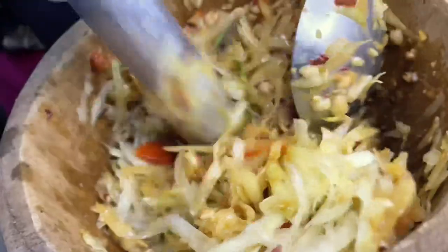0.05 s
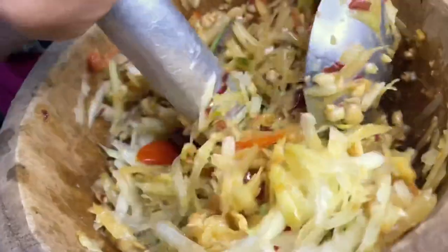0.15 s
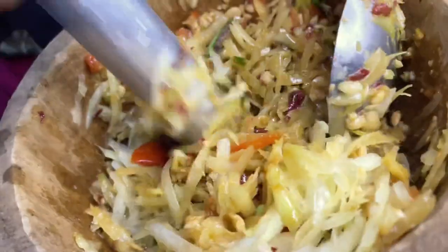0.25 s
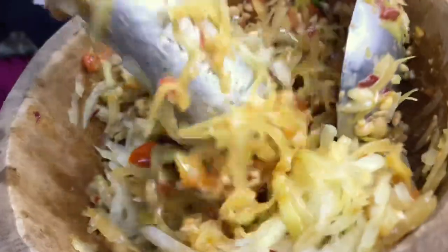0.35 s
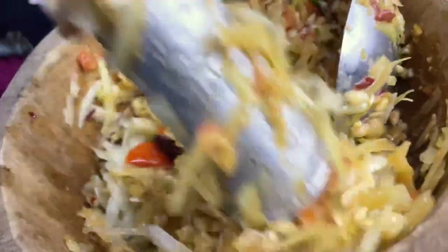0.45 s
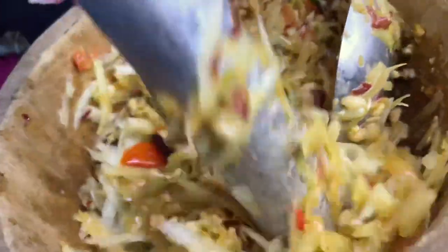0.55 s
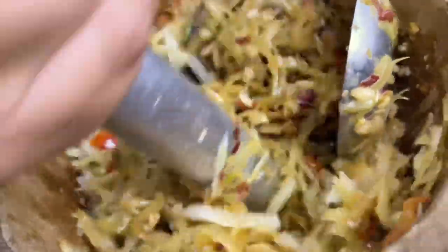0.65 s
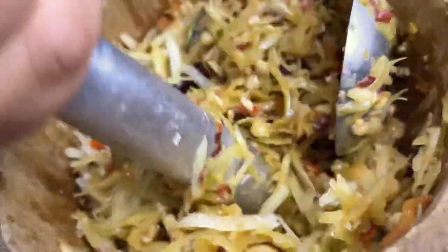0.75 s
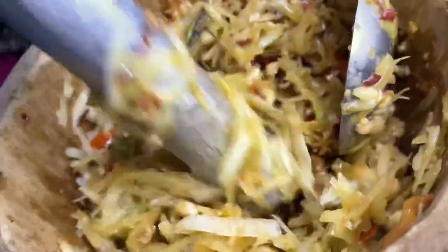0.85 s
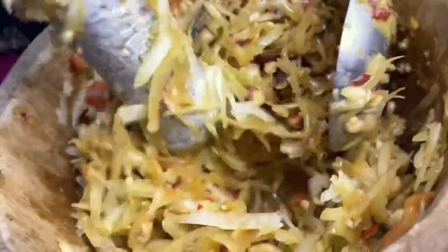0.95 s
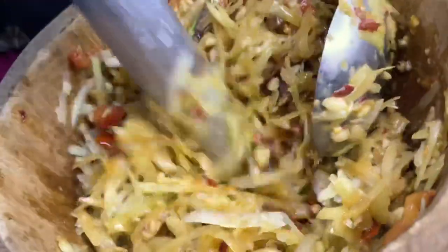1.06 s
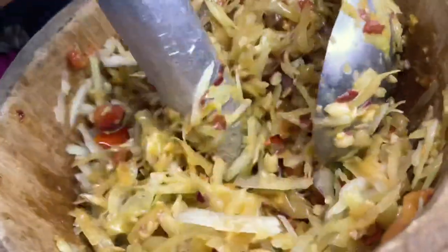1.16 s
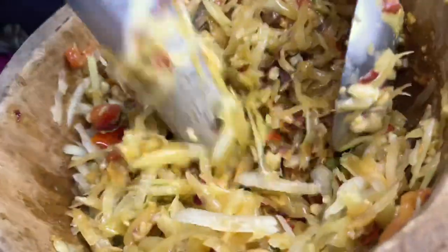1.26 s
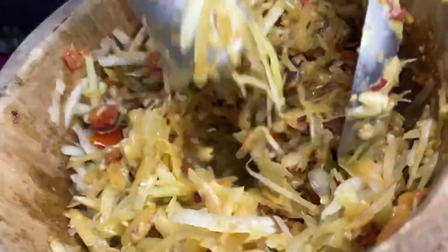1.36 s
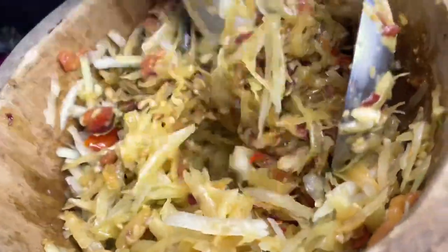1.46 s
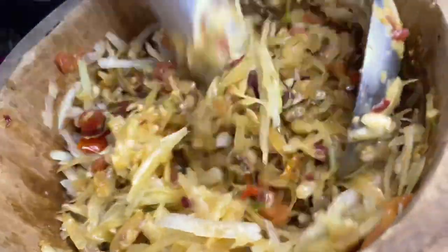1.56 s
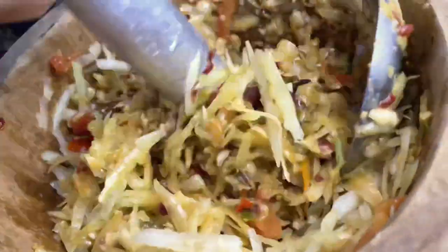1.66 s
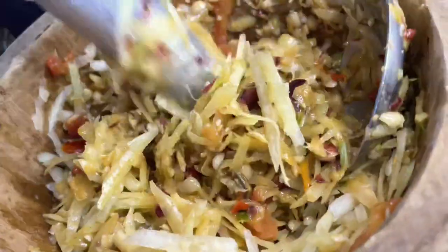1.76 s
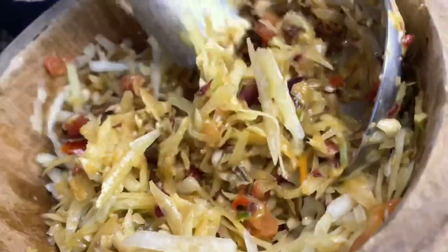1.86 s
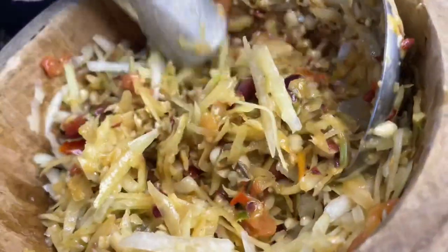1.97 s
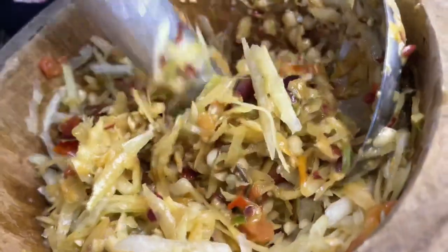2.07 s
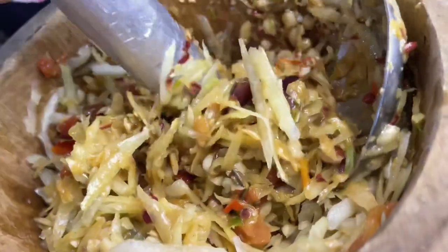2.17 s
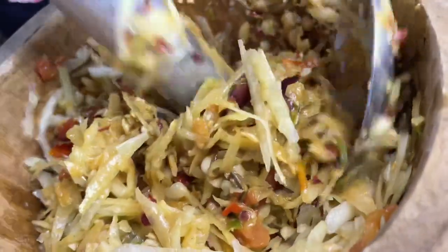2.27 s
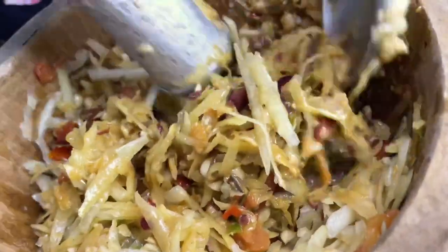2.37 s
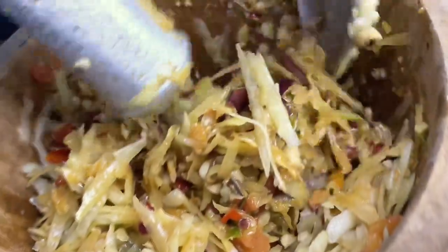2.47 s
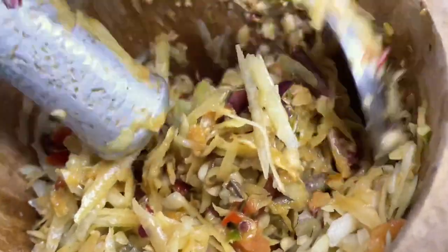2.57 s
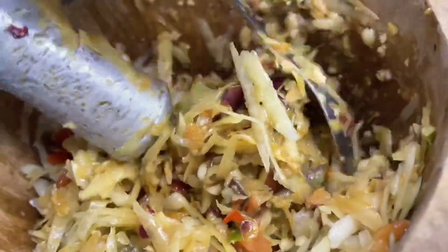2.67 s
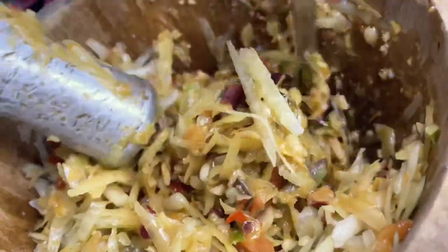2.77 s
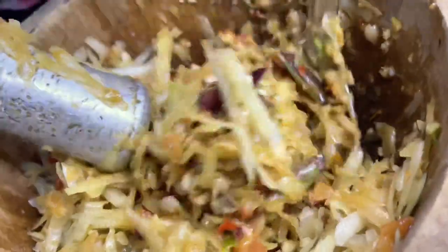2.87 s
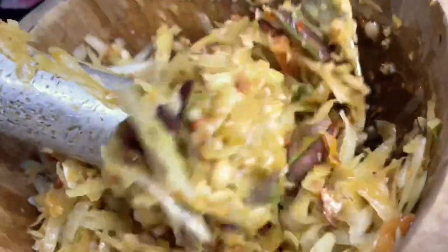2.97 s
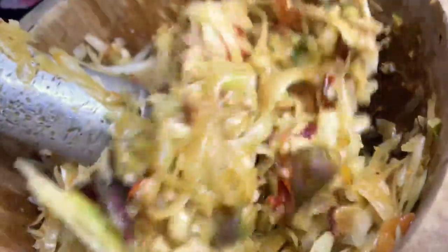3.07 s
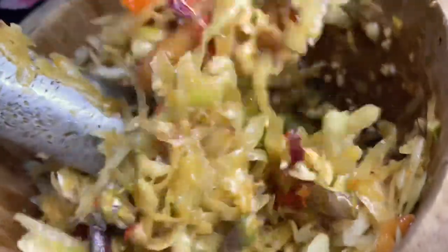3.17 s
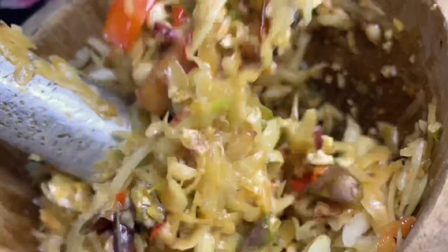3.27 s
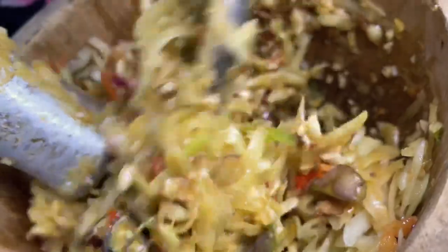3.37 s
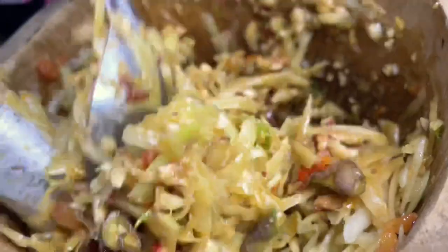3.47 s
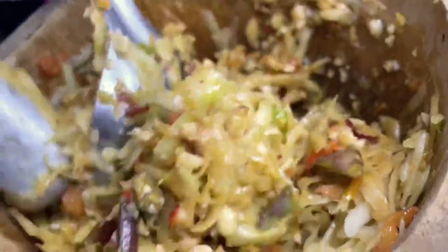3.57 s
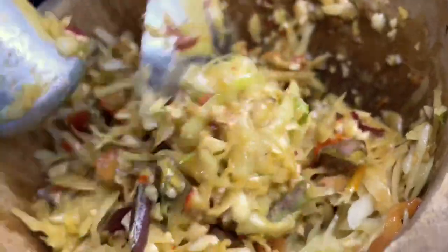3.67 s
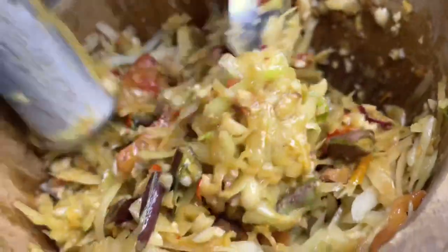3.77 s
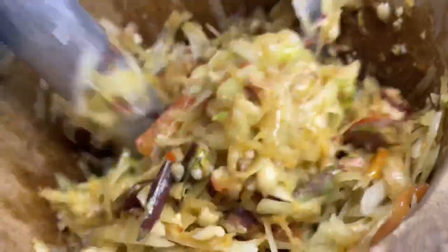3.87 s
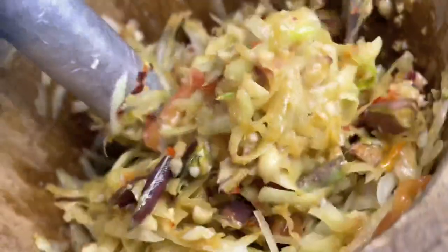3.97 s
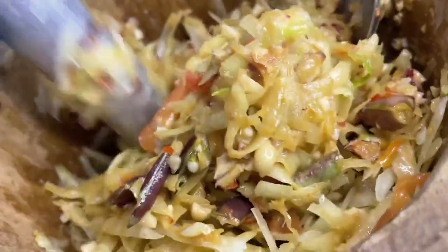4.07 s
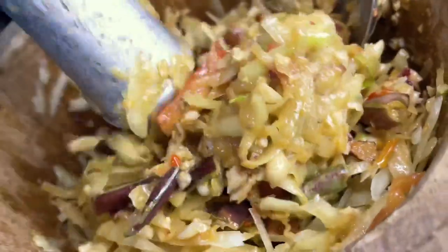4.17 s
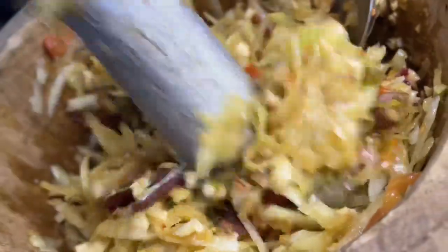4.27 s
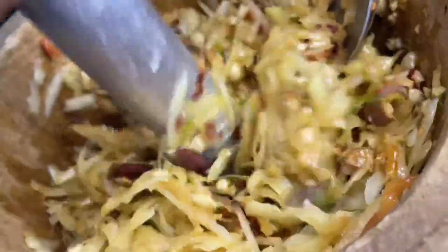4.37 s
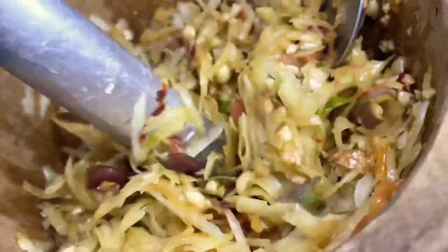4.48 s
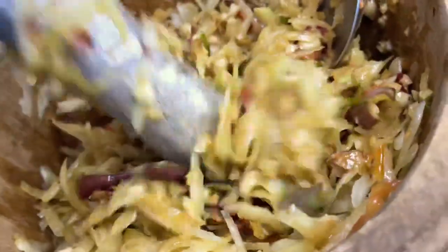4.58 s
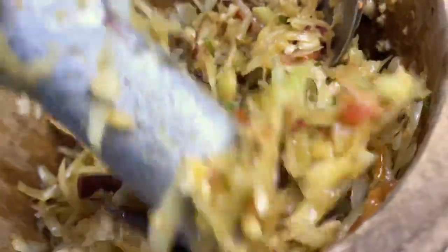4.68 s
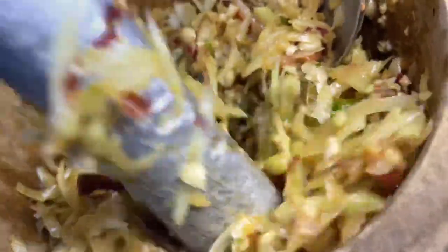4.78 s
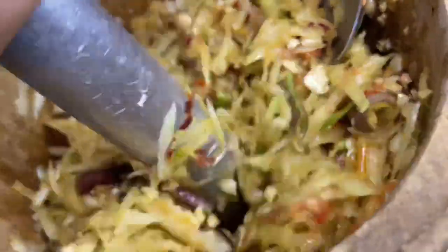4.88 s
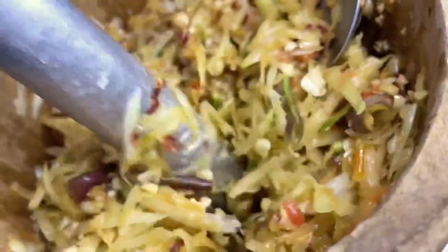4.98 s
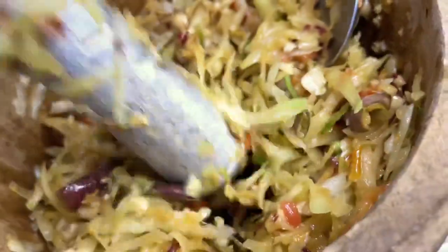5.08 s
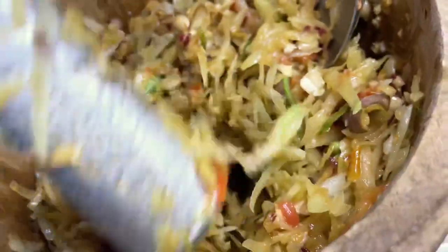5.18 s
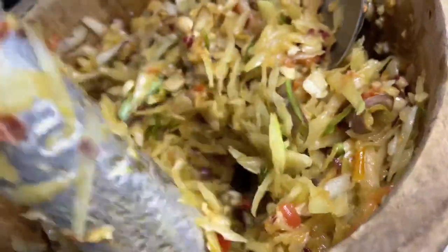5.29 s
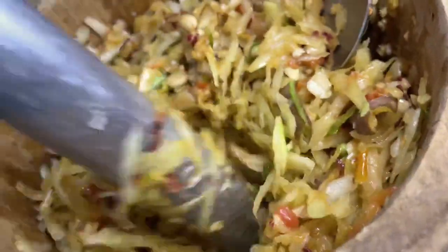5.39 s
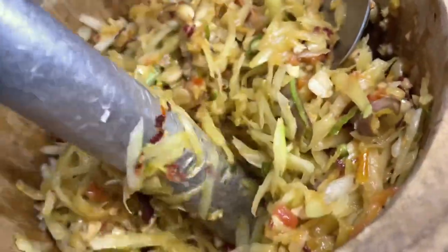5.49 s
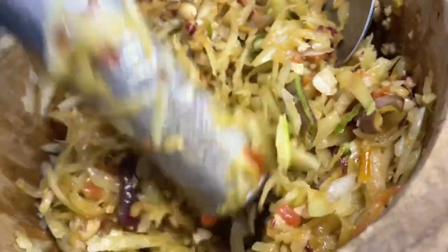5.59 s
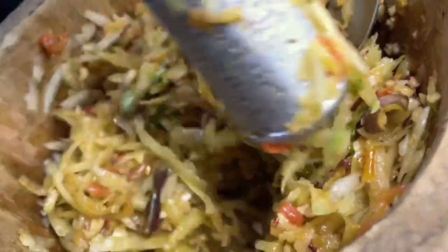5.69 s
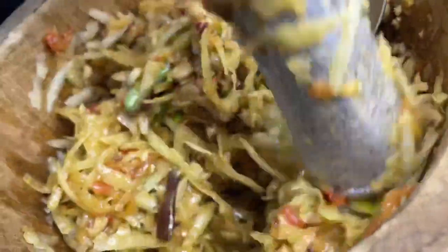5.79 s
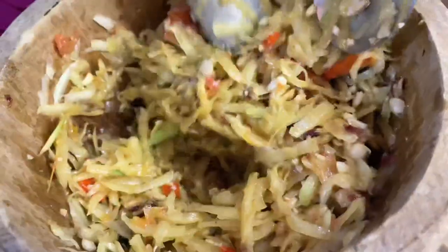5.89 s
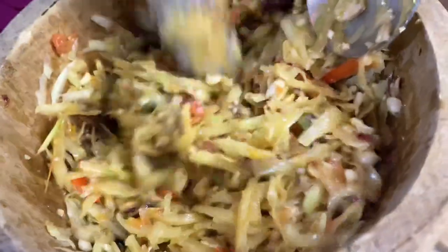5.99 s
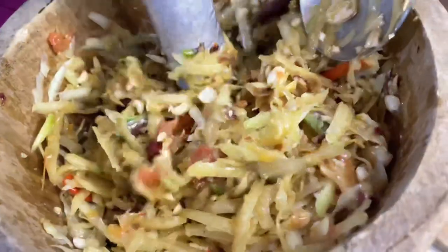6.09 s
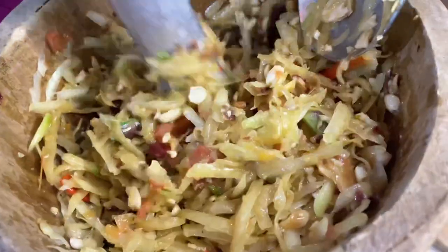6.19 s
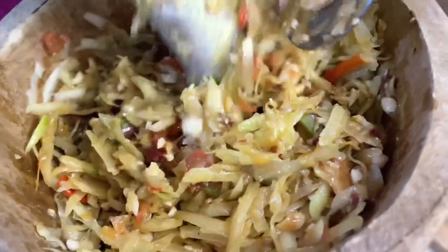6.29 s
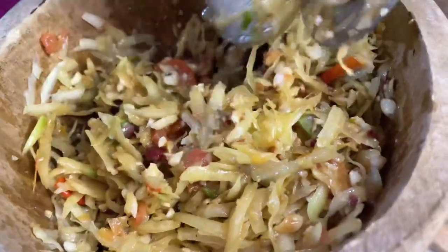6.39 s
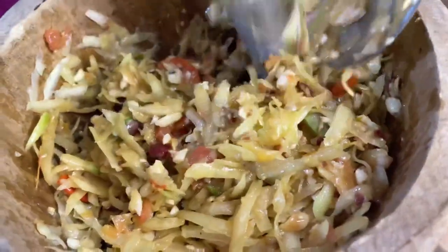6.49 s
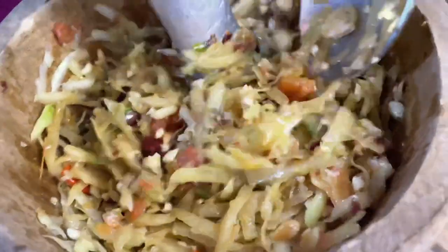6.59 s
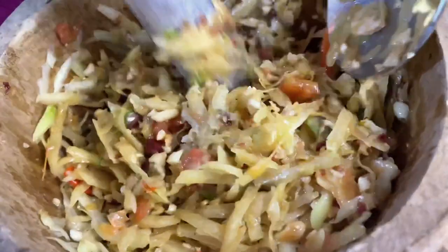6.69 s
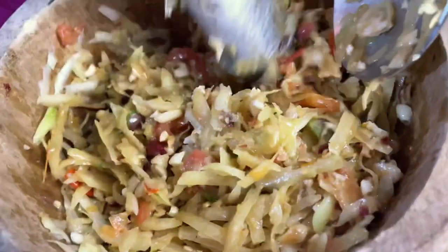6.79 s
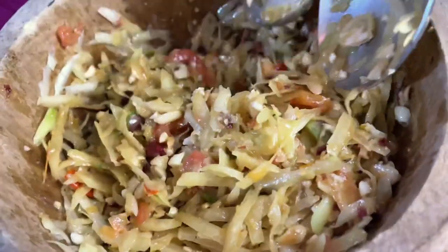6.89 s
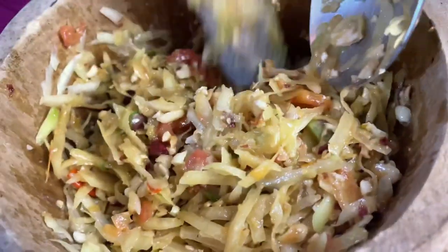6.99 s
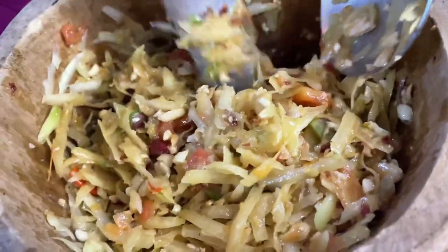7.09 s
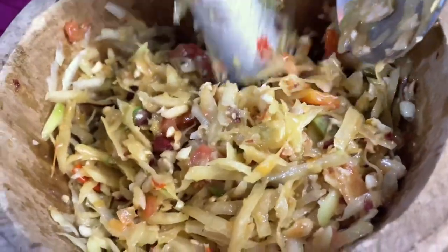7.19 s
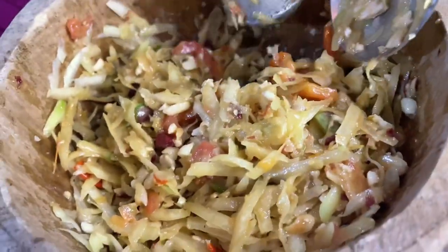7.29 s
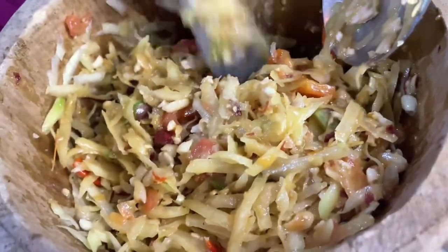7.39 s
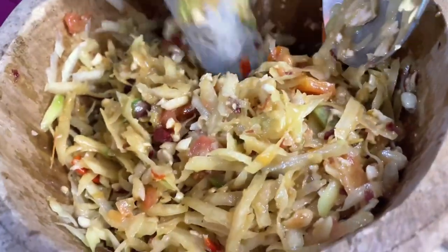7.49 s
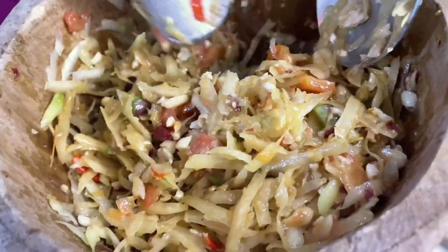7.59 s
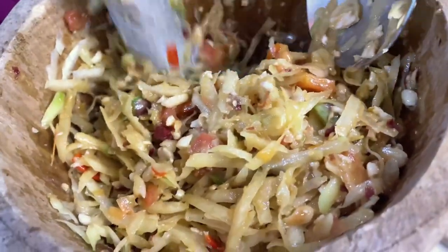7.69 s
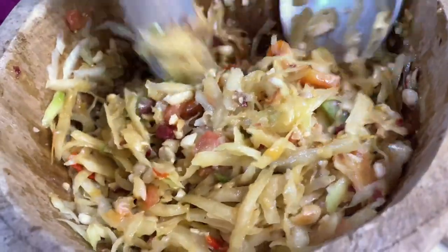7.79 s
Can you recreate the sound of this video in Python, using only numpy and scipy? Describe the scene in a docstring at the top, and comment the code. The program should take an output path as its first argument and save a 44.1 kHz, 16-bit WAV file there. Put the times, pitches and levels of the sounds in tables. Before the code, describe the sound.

A pestle pounds wet shredded salad in a wooden mortar, irregular dull knocks mixed with squelches and fizzing crunches in a small hard-walled kitchen.

```python
"""A pestle pounds shredded salad in a wooden mortar while a spoon turns it, close up in a kitchen.
Most strokes end in a dull knock: damped modes of the wood, with a blur of noise around them.
Each stroke squelches and fizzes through the wet shreds, as dense grains of tiny dying rings.
Short pops, snaps and faint ticks are added, and after every blow the hard-walled room rings,
as decaying noise convolved with the sound; a quiet rumble and hiss of shaped noise lies beneath."""
import sys
import numpy as np
from scipy import signal
from scipy.io import wavfile

SR = 44100
rng = np.random.default_rng(int(sys.argv[2]) if len(sys.argv) > 2 else 0)


def write(x):
    x = np.atleast_2d(x).T
    wavfile.write(sys.argv[1], SR, np.round(np.clip(x, -1, 1) * 32767).astype(np.int16))


N = 346008

# blows of the pestle: (time [s], pitch of the bowl's main ring [Hz], force [dB],
# cushion of shreds [0-1], place from the bowl's floor to its wall [0-1])
BLOWS = [(.715, 805, -21.5, 0.01, .12), (1.682, 685, -30, 0.63, 0.36), (2.035, 873, -27.5, .02, 0.44),
         (2.0416, 674, -23, .8, 0.62), (2.4308, 850, -41, 1.0, 0.51), (2.732, 692, -30, 0.6, 0.069),
         (3.594, 720, -46.5, 1, 0.23), (3.9361, 682, -32.5, .9, 0.43), (4.4689, 725, -29.5, 0.64, 0.19),
         (4.974, 752, -22, 0.18, 0.16), (5.3271, 722, -17, 0.18, 1), (5.361, 733, -28, .3, .3),
         (5.49, 706, -39, 0.2, .05), (6.102, 713, -27.5, 0.41, 0.058), (6.546, 643, -48, 0.5, 0.42),
         (6.678, 730, -22, 0, 0.24), (6.9872, 630, -43, 0.14, 0.46), (7.0194, 780, -42.5, 0.5, .05),
         (7.078, 564, -45, 0.6, .02), (7.093, 573, -45, .6, 0.018), (7.3797, 840, -33.5, 0.07, 0.42),
         (7.417, 627, -34, 0.38, 0.062), (7.76, 680, -41.5, .7, 0.61), (7.788, 720, -36, .6, 0.28)]
# edges of the six frequency parts of a knock: (frequency [Hz])
PART_EDGES_HZ = [90, 300, 560, 1100, 1750, 3100, 15500]
# spectral density of the fizz of the top shreds: (frequency [Hz], level per Hz [dB])
FIZZ_SPECTRUM = [(2000, -2), (3000, -4.5), (4400, 0), (6000, -1.5), (8200, -2.5), (11000, -9),
                 (16000, -11.5)]

MAIN_RING_HZ = 730
PART_BANDS = [signal.butter(2, PART_EDGES_HZ[k:k + 2], "band", fs=SR, output="sos") for k in range(6)]
PART_FLOORS = [signal.butter(3, .85 * hz, "high", fs=SR, output="sos") for hz in PART_EDGES_HZ[:-1]]


def amp(db):
    """Amplitude ratio of a level in decibels."""
    return 10 ** (np.asarray(db) / 20)


def evened(x):
    """Normalization to unit root-mean-square amplitude."""
    return x / np.sqrt(np.mean(x ** 2) + 1e-20)


def read(points, hz, axis=1):
    """Interpolation of a table's column at any frequency, along straight lines in log frequency."""
    table = np.array(points, float)
    return np.interp(np.log(hz + 1), np.log(table[:, 0]), table[:, axis])


def over_time(points):
    """Linear interpolation of a (time, value) table at every sample."""
    return np.interp(np.arange(N) / SR, *np.transpose(points))


def add(mix, s, sound):
    """Linear superposition of a sound that starts at s seconds."""
    part = mix[max(round(s * SR), 0):][:len(sound)]
    part += sound[:len(part)]


def decay(t, t60):
    """Exponential damping: the amplitude falls by 60 dB in t60 seconds."""
    return np.exp(-np.log(1000) * t / t60)


def knock(ring_hz, clack_shift, levels_db, blur_t60=0.04, contact_s=0.0012, detune=0.013):
    """Modal synthesis: a blow rings the wood's modes, plus a short blur of dense ones damped by salad."""
    # modes of mortar and pestle: (frequency [Hz], level [dB], 60 dB decay time [s])
    wood_modes = [(156, 0, .06), (363, 1, 0.059), (426.3, -3.5, 0.058), (535, 1.5, 0.047),
                  (599.5, -9, 0.05), (737.5, 1.5, 0.027), (855, -2, .02), (1345, 0, .06), (1550, -9, .015),
                  (1840, -16.5, 0.033), (2023, 6, 0.018), (2280, 3, .018), (2810, -9.5, 0.014),
                  (3460, 8.5, 0.0031), (4524, 1.5, 0.014), (6470, 0, .007)]
    # strength of each part's blur of dense modes: (factor on its clear modes)
    blur_strength = [1.3, 0.51, 0.23, 1, 0.47, 0.69]
    t = np.arange(SR // 11) / SR
    hz, db, t60 = np.transpose(wood_modes)
    part_of = np.searchsorted(PART_EDGES_HZ[1:-1], hz)

    # the strike point and the load of salad shift each mode a little
    random_shift = 1 + detune * rng.standard_normal(len(hz))
    hz = hz * np.where(part_of == 2, ring_hz / MAIN_RING_HZ, random_shift)
    hz = hz * np.where(part_of == 4, clack_shift, 1)
    size = amp(db + 2 * rng.standard_normal(len(hz))) * rng.choice([-1, 1], len(hz))
    modes = size[:, None] * np.sin(2 * np.pi * hz[:, None] * t) * decay(t, t60[:, None])

    contact = 1 - np.exp(-(t / contact_s) ** 2)  # the shreds cushion the first instant
    out = np.zeros(len(t))
    for k, level_db in enumerate(levels_db):
        dull_noise = signal.lfilter([1], [1, -.9], rng.standard_normal(len(t)))
        blur = signal.sosfilt(PART_BANDS[k], dull_noise) * decay(t, blur_t60)
        clear = evened(modes[part_of == k].sum(0))
        part = signal.sosfilt(PART_FLOORS[k], contact * (clear + blur_strength[k] * evened(blur)))
        out += amp(level_db) * part / np.std(part[:SR // 50])  # level set over the first 20 ms
    return out


def pestle(loud_clack_s=7.3797, loud_clack_db=-25.5, clack_part=4):
    """Position-dependent modal excitation: shreds muffle high parts, the wall trades thud for rim ring."""
    # parts of a knock, low to high: floor thump, thud of the bowl's base, main ring, rim ring,
    # pestle clack, contact tick: (level at 0 dB force [dB], slope with force [dB per dB],
    # change from a full cushion [dB], change from striking the wall [dB])
    part_response = [(-25.5, 0.61, -0.5, 1), (2.5, 1, 0, -17), (0, 1, 0, 0), (-10.5, 1, -13, 6.5),
                     (0, 1, -20, 0), (-17.5, 0.84, -14.5, -0.5)]
    # the clack is pitched higher in the later blows: (time [s], factor on mode frequency)
    clack_shifts = [(5.4, 1.003), (6.0, 1.132)]
    out = np.zeros(N)
    full_db, per_db, cushion_db, wall_db = np.transpose(part_response)
    shift_s, shift = np.transpose(clack_shifts)
    for s, ring_hz, force_db, cushion, place in BLOWS:
        levels_db = full_db + per_db * force_db + cushion_db * cushion + wall_db * place
        add(out, s, knock(ring_hz, np.interp(s, shift_s, shift), levels_db))

    # one blow has an extra-loud clack around 2.3 kHz
    clack_only_db = np.where(np.arange(len(part_response)) == clack_part, loud_clack_db, -np.inf)
    clack_shift = np.interp(loud_clack_s, shift_s, shift)
    add(out, loud_clack_s, knock(MAIN_RING_HZ, clack_shift, clack_only_db))
    return out


def crackle(per_s, spread_db):
    """Poisson-like impulses: random clicks of either sign, many small and a few large."""
    chance, size = rng.random((2, N), dtype=np.float32)
    at = np.flatnonzero(chance < per_s / SR)
    signed = 2 * size[at] - 1
    rarity = np.minimum(-np.log(abs(signed) + 1e-12), 3.5)
    out = np.zeros(N)
    out[at] = np.sign(signed) * amp(spread_db * rarity)
    return out


def grains(points, per_s, spread_db, cycles, drift_db, count=36):
    """Granular resonance: tiny dying rings of many pitches, whose balance drifts as the shreds shift."""
    t, out = np.arange(SR // 40) / SR, np.zeros(N)
    edges = np.geomspace(points[0][0], points[-1][0], count + 1)
    knots = np.arange(0, N + SR // 12, SR // 12)
    for hz in np.sqrt(edges[:-1] * edges[1:]):
        turns = hz * t
        ring = np.sin(2 * np.pi * turns) * np.exp(-turns / cycles) * (1 - np.exp(-2 * turns))
        drift = np.interp(np.arange(N), knots, rng.standard_normal(len(knots)))
        clicks = crackle(per_s / count, spread_db) * amp(drift_db * drift)
        # higher rings are shorter, so start taller
        out += amp(read(points, hz)) * hz * signal.oaconvolve(clicks, ring)[:N]
    return evened(out)


def push(s, swell, fade, db, roundness=1.274):
    """Power envelope of one push: 20 dB down one swell before its peak and one fade after it."""
    t = np.arange(0, N, 32) / SR
    away = np.minimum(np.where(t < s, (s - t) / swell, (t - s) / fade), 10)
    # roundness 1 is a pointed peak, 2 a bell
    return amp(db) ** 2 * np.exp(-np.log(100) * np.minimum(away, away ** roundness))


def loudness(pushes):
    """Incoherent addition: the powers of many pushes sum, and the root is their joint amplitude."""
    power = sum(push(*row) for row in pushes)
    return np.interp(np.arange(N), np.linspace(0, N, len(power)), np.sqrt(power))


def shreds(squelch_per_s=3000, fizz_per_s=8000, squelch_spread_db=2.4):
    """Dense impulsive fracture: deep shreds squelch in the bowl's hollow, those on top fizz."""
    # pushes through the shreds and the smack as the pestle lifts out: (peak time [s], swell [s],
    # squelch level [dB], fizz level [dB], lift delay after the peak [s], lift level [dB])
    strokes = [(.156, 0.041, -31, -40.5, 0.15, -38.5), (0.698, 0.073, -39.5, -40, 0.16, -47),
               (1.158, 0.024, -25, -35, 0.14, -36.5), (1.66, 0.071, -40, -39, 0.13, -49.5),
               (2.14, 0.098, -44.5, -44, .16, -55), (2.691, 0.065, -46.5, -46.5, 0.11, -54),
               (3.951, .075, -42, -44.5, 0.18, -40), (4.444, 0.047, -32, -37.5, .16, -49),
               (4.957, 0.054, -34, -38.5, .17, -47.5), (5.476, 0.049, -32.5, -37, .131, -40),
               (6.093, 0.068, -36, -45, 0.2, -54), (6.633, 0.049, -35, -36.5, .112, -40.5),
               (7.113, 0.028, -39, -38, 0.044, -48), (7.832, 0.059, -45.5, -50, .15, -50)]
    # the spoon brushes over the top of the heap, fizz only: (time [s], level [dB])
    spoon_brushes = [(.1, -51), (1.12, -54.5), (1.368, -54), (3.58, -55.5), (6.345, -56.5), (7.462, -44)]
    # spectral density of the deep squelch: (frequency [Hz], level per Hz [dB])
    squelch_spectrum = [(200, -25.5), (380, -19), (560, -6), (820, 3.5), (1120, -3.5), (1450, -2),
                        (1950, -2.5), (2800, -11), (4500, -14)]
    # a blow leaves the heap crunching, at a level relative to its force
    crunch_db, crunch_swell_s, crunch_fade_s = -24.5, 0.014, 0.28
    brush_s = 0.051  # swell and fade of a brush
    fade_share = 0.77  # a push dies away in this share of its swell
    fizz_longer = 1.1  # the top shreds are met first and left last
    # a smack swells and fades in lift_s at lift_ref_db; a weaker one comes from a slower lift
    # and lasts longer, twice as long for each lift_doubling_db
    lift_s, lift_ref_db, lift_doubling_db, lift_fizz_db = .019, -38, 9, -6

    deep = []
    for s, _, force_db, *_ in BLOWS:
        deep.append((s + crunch_swell_s, crunch_swell_s, crunch_fade_s, force_db + crunch_db))
    top = [(s, brush_s, brush_s, db) for s, db in spoon_brushes]
    for s, swell, squelch_db, fizz_db, lift_after, lift_db in strokes:
        fade = fade_share * swell
        lift = lift_s * 2 ** ((lift_ref_db - lift_db) / lift_doubling_db)
        deep.append((s, swell, fade, squelch_db))
        deep.append((s + lift_after, lift, lift, lift_db))
        top.append((s, fizz_longer * swell, fizz_longer * fade, fizz_db))
        top.append((s + lift_after, lift, lift, lift_db + lift_fizz_db))
    squelch = grains(squelch_spectrum, squelch_per_s, squelch_spread_db, cycles=1.17, drift_db=1.5)
    fizz = grains(FIZZ_SPECTRUM, fizz_per_s, spread_db=3.3, cycles=4.5, drift_db=2.2)
    return squelch * loudness(deep) + fizz * loudness(top)


def pops(ring_s=0.0014, snap=0.74):
    """Impulsive excitation: each pop is a snap of band noise with a brief damped ring."""
    # short pops and snaps, some of them part of a knock or squelch:
    # (time [s], peak level [dB], pitch [Hz])
    bursts = [(0.1224, -25, 904), (.3058, -25, 1310), (0.699, -19, 2290), (1.0765, -39.5, 6290),
              (1.158, -18, 1890), (1.2893, -29, 1300), (2.036, -13, 3310), (2.652, -33, 2960),
              (2.702, -28, 1410), (2.948, -38.5, 960), (3.0085, -39, 925), (3.3278, -44.5, 5660),
              (3.8097, -37.5, 5900), (3.899, -35, 690), (4.377, -34, 4450), (4.8353, -38, 800),
              (5.5992, -34, 1030), (5.9309, -40, 13260), (6.2492, -37, 2520), (6.2623, -34.5, 1050),
              (6.613, -22.5, 1500), (6.62, -23, 1280), (6.7427, -26, 975), (7.1631, -34.5, 12000),
              (7.4848, -24.5, 3270), (7.522, -31.5, 2720), (7.5565, -35.5, 12030)]
    t, out = np.arange(SR // 50) / SR, np.zeros(N)
    for s, db, hz in bursts:
        band = signal.butter(2, [hz * .6, min(hz * 2, SR / 2.2)], "band", fs=SR, output="sos")
        noise = evened(signal.sosfilt(band, rng.standard_normal(len(t))))
        burst = np.sin(2 * np.pi * hz * t) + snap * noise
        pop = burst * t * np.exp(-t / ring_s)
        add(out, s, amp(db) * pop / abs(pop).max())
    return out


def settling(stray_db=-5):
    """Sparse random emission: the wet heap ticks faintly, most while the spoon lifts and folds it."""
    # how much the spoon stirs the heap: (time [s], level of its ticking [dB])
    stirring = [(0, -67), (2.5, -70), (2.9, -60.5), (3.4, -68.5), (4.3, -65.5), (5.2, -62.5), (5.8, -70),
                (6.3, -65.5), (6.9, -77)]
    ticks = grains(FIZZ_SPECTRUM, per_s=1500, spread_db=4, cycles=3, drift_db=2)
    # a stray louder snap now and then
    strays = grains(FIZZ_SPECTRUM, per_s=12, spread_db=3, cycles=8, drift_db=1)
    return amp(over_time(stirring)) * (ticks + amp(stray_db) * strays)


def kitchen(x, build_s=0.011, size=256):
    """Diffuse reverberation: dense reflections swell, then each band dies at its own speed."""
    # reverberation: (frequency [Hz], 60 dB decay time [s], level [dB])
    room_bands = [(130, 0.47, 3), (415, 0.67, -7.5), (796, 0.66, -10.5), (1500, 0.64, -7.5),
                  (2240, 0.58, -15), (3200, 0.71, -11.5), (12000, 0.34, -15)]
    hz, t, z = signal.stft(crackle(4000, 2.5)[:SR], SR, nperseg=size)
    shape = decay(t, read(room_bands, hz)[:, None]) * (1 - np.exp(-(t / build_s) ** 2))
    shape /= np.sqrt((shape ** 2).mean(1, keepdims=True))
    shape *= amp(read(room_bands, hz, axis=2))[:, None]
    plain, tail = (signal.istft(v, SR, nperseg=size)[1] for v in (z, z * shape))
    return signal.fftconvolve(x, tail / np.linalg.norm(plain))[:N]


def reverberation(wet, count=3):
    """Incoherent averaging: independently drawn knocks and tails add up to a smooth room tail."""
    # the kitchen recedes as the microphone comes over the bowl: (time [s], level change [dB])
    room_level = [(5.4, 0.6), (6.0, -2)]
    room = sum(kitchen(pestle() + amp(-1.84) * wet) for draw in range(count)) / np.sqrt(count)
    return room * amp(over_time(room_level))


def shelf(x, hz, side, db):
    """Shelving equalization: raises or lowers one end of the spectrum along a curve."""
    end = signal.sosfiltfilt(signal.butter(2, hz, side, fs=SR, output="sos"), x)
    return x + (amp(db) - 1) * end


def over_bowl(x):
    """Position-dependent response: over the bowl's mouth the microphone hears more treble and depth."""
    # shelf gain as the microphone shifts over the mouth: (time [s], gain [dB])
    mouth_gain = [(5.4, -6.5), (6.0, 4.5)]
    gain_db = over_time(mouth_gain)
    return shelf(shelf(x, 9200, "high", gain_db), 340, "low", gain_db)


def colour(x, points, size=2048):
    """Minimum-phase filtering: a causal filter with the given spectrum."""
    log_gain = np.log(amp(read(points, abs(np.fft.fftfreq(size, 1 / SR)))))
    taps = np.fft.ifft(np.exp(np.conj(signal.hilbert(log_gain)))).real
    return signal.oaconvolve(x, taps[:size // 2])[:N]


def background(level_db=-59):
    """Stationary noise: white noise shaped into a steady low rumble and hiss."""
    # spectrum of the quiet: (frequency [Hz], relative level [dB])
    quiet_spectrum = [(20, 6), (55, 3.5), (200, 0), (500, -5), (1000, -10.5), (2000, -14.5), (3500, -22),
                      (5200, -15.5), (6300, -13.5), (7100, -20), (15000, -20.5)]
    return amp(level_db) * evened(colour(rng.standard_normal(N), quiet_spectrum))


def scene():
    """Superposition: knocks and wet shreds with their reverberation, over the quiet background."""
    wet = shreds() + pops() + settling()
    room = reverberation(wet)
    heard = over_bowl(pestle() + wet + room)
    return (heard + background())[None]


def record(dry, edge_hz=14600):
    """Soft saturation: the hardest blows round off near full scale; then a low-pass limits the band."""
    rounded = dry / (1 + (dry / .9) ** 6) ** (1 / 6)
    low_pass = signal.firwin(161, edge_hz, window=("kaiser", 9), fs=SR)
    return signal.oaconvolve(rounded, low_pass[None], "same")


dry = scene()
out = record(dry)
write(out)
```